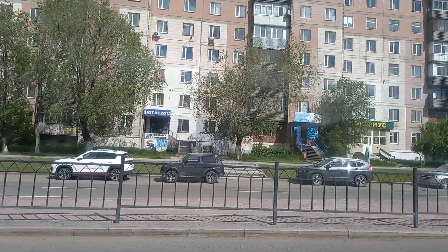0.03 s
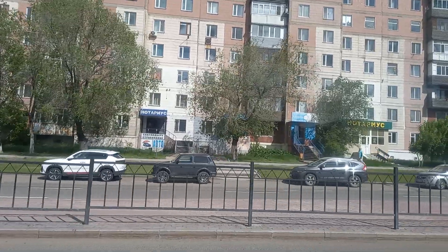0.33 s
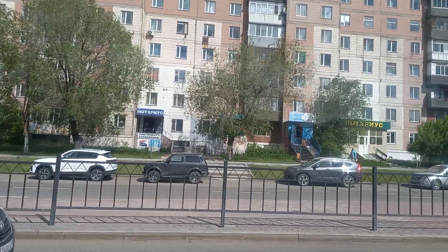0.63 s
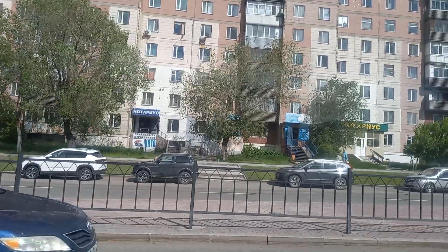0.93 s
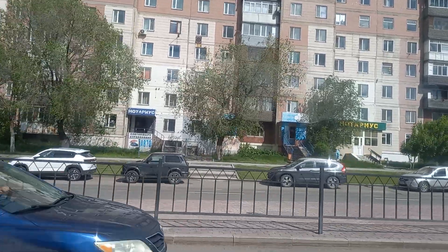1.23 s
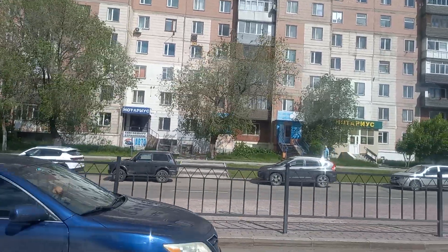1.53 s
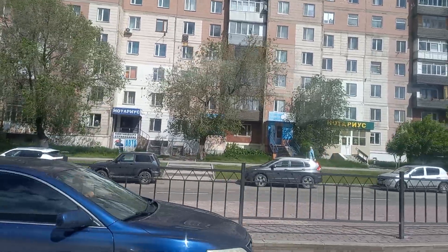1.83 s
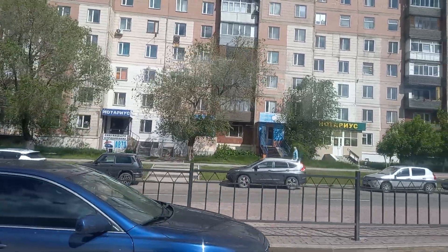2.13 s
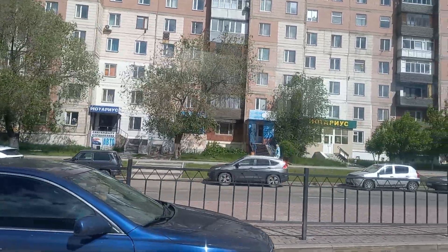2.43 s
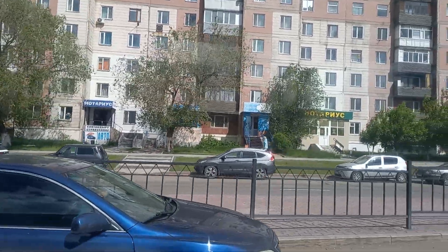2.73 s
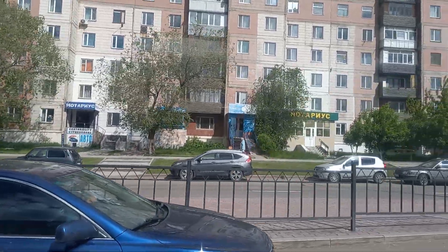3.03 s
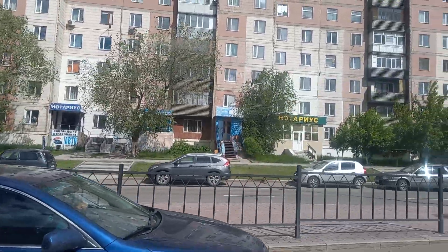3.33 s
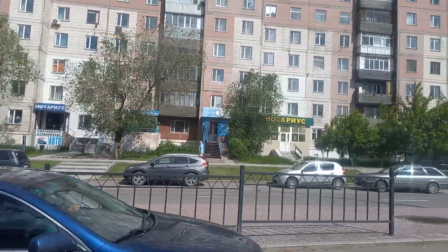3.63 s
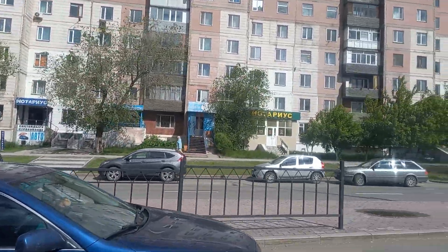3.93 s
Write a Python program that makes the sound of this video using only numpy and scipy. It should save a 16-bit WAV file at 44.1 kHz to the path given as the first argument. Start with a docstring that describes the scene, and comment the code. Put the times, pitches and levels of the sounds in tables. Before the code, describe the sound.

Bus engine drone and road hiss heard inside the cabin, with light plastic ticks.

```python
"""A four-cylinder bus engine, heard from a window seat as the bus pulls away, gathers speed and eases off.
Its orders swell as they sweep through the cabin's resonances. Underneath, the road shakes the body into
boom, rumble and soft thuds; the tyres roar and hiss, and thin air rushes past the window. An air valve
puffs twice and loose trim ticks close by. Taken inside the cabin on a pair of dull-topped microphones."""
import sys
import numpy as np
from scipy import signal
from scipy.fft import rfft, irfft, dct
from scipy.io import wavfile

SR = 44100
rng = np.random.default_rng(int(sys.argv[2]) if len(sys.argv) > 2 else 0)


def inscribe(sig):
    """Save sig as 16-bit PCM at rate SR to the path in sys.argv[1].

    A 1-D sig is mono; a 2-D sig holds one channel per row.
    Samples are clipped to [-1, 1] before scaling.
    """
    pcm = np.round(np.clip(np.atleast_2d(sig).T, -1, 1) * 32767)
    wavfile.write(sys.argv[1], SR, pcm.astype(np.int16))


N = 176400
T, HZ = np.arange(N) / SR, np.maximum(np.arange(N // 2 + 1) * SR / N, 1)

# engine firing rate, two firings to a crank turn: t/s, f/Hz
FIRING_RATE = [(0, 38.03), (.3, 37.17), (.7, 37.88), (1.05, 41.71), (1.4, 47), (1.7, 50), (1.95, 54.5),
               (2.2, 59.5), (2.4, 63.86), (2.55, 65.7), (2.68, 64), (2.9, 58.03), (3.15, 56.6),
               (3.35, 48.15), (3.55, 45.8), (3.75, 42.7), (4, 38.49)]
# engine load: t/s, level/dB
ENGINE_LOAD = [(0, -16.5), (.5, -5.5), (.7, -3.5), (.95, -3.5), (1.15, -1.5), (1.5, -0.5), (1.65, -1),
               (1.9, 2), (2.12, 3.5), (2.3, -2), (2.6, 0.5), (2.7, -10), (2.92, -13), (3.0, -2),
               (3.15, -3.5), (3.3, -8), (3.6, -4.5), (3.72, -3), (3.83, -4), (3.95, 0.5)]
# engine orders: cycles per crank turn, level/dB, dB per dB of load
ENGINE_ORDERS = [(2, -22.5, 3.8), (3, -18, 1), (4, -17, 1.5), (5, -36.5, 3.5), (6, -23.5, 1.97),
                 (7, -36.5, 0), (8, -33.5, 2.4), (10, -29.5, 1), (12, -38.5, -0.1)]
# how the cabin carries the engine to the seat: f/Hz, gain/dB
CABIN_RESPONSE = [(30, -20), (41, -13.5), (46, -0.5), (49, -7.5), (54, -24.5), (63, -27), (74, -4.5),
                  (80, -3), (86, 1), (93, -7.5), (103, -17), (117, -19), (126, -3), (131, -5.5), (141, -3),
                  (152, -12.5), (175, -14), (200, -18.5), (235, -9.5), (400, -25.5)]
# boom of the body all around: t/s, level/dB
BOOM_LEVEL = [(0, -28), (.5, -31.5), (.9, -32.5), (1.3, -21), (1.7, -27.5), (2.1, -25.5), (2.5, -21.5),
              (2.9, -26.5), (3.3, -24.5), (3.6, -29.5), (4, -23.5)]
# its colour: f/Hz, gain/dB
BOOM_COLOUR = [(20, -46.5), (32, -39), (44, -13), (58, -17.5), (70, -5.5), (83, 5.5), (96, -5.5),
               (112, -4.5), (140, -9.5), (200, -38)]
# road rumble: t/s, level/dB
RUMBLE_LEVEL = [(0, -41.5), (.15, -40.5), (.8, -38), (1.05, -33.5), (1.28, -28), (1.6, -30), (1.82, -27),
                (2.1, -29.5), (2.5, -28.5), (2.9, -34), (3.3, -34), (3.68, -35), (3.8, -28), (4, -31)]
# its colour: f/Hz, gain/dB
RUMBLE_COLOUR = [(100, -20), (135, -1), (170, -1.5), (200, 0.5), (235, -1), (280, -2), (360, -8),
                 (420, -12.5), (520, -17), (800, -51.5)]
# tyre roar, heard from inside: t/s, level/dB
ROAR_LEVEL = [(0, -50.5), (.3, -50.5), (.75, -49.5), (1, -45), (1.27, -41.5), (1.45, -41.5), (1.75, -38),
              (2.1, -42), (2.3, -40), (2.53, -39.5), (2.7, -47.5), (2.82, -42.5), (2.95, -46.5),
              (3.65, -48), (3.85, -45), (4, -47)]
# its colour: f/Hz, gain/dB
ROAR_COLOUR = [(300, -28.5), (450, -2.5), (520, -2.5), (600, -3.5), (730, -6), (900, -7), (1070, -7),
               (1250, -14), (1700, -22.5)]
# tyre hiss: t/s, level/dB
HISS_LEVEL = [(0, -57), (.3, -56.5), (.75, -56), (1, -52), (1.3, -46.5), (1.5, -47.5), (1.75, -44),
              (2.2, -47.5), (2.55, -45), (2.8, -48), (3.1, -50), (3.6, -52), (3.8, -52), (4, -52)]
# its colour: f/Hz, gain/dB
HISS_COLOUR = [(800, -24.5), (1250, 3.5), (1700, 3.5), (1950, 3.5), (2300, 3.5), (2700, 1.5), (3500, 0.5),
               (4500, 0.5), (5800, -1), (6500, -4.5), (7500, -13), (9000, -23)]
# thuds from bumps in the road: t/s, level/dB, f/Hz
ROAD_BUMPS = [(0.931, -28, 169.9), (1.38, -25, 238.7), (1.77, -22.5, 175), (3.099, -26, 191.7),
              (3.749, -25, 260.7)]
# valve jets, the first two merging into one puff: t/s, level/dB, hold/s, t60/s, low f/Hz, top f/Hz
VALVE_JETS = [(1.57, -35.5, 0.018, 0.19, 2960, 12860), (1.58, -36.5, 0.02, 0.21, 1202, 2863),
              (2.697, -39, .018, .22, 3020, 12100)]
# loose trim near the window: t/s, level/dB, crack f/Hz
TRIM_TICKS = [(0.12, -37, 2850), (0.532, -31.5, 3800), (0.5375, -28.5, 2062), (0.536, -26, 7550),
              (.5635, -33, 6500), (0.6307, -36, 4190), (0.7808, -33.5, 4300), (0.9096, -34, 4418),
              (1.067, -31, 4260), (1.094, -29, 6500), (1.293, -28.5, 4300), (2.8008, -23, 9500),
              (2.8358, -26.5, 6000), (2.9275, -30.5, 6500), (2.939, -29.5, 4374), (2.9677, -30, 6500),
              (3.055, -28.5, 4600), (3.060, -36, 5523), (3.2346, -24.5, 4000), (3.236, -33.5, 2000),
              (3.236, -34, 7000), (3.463, -29, 4200), (3.5272, -28, 4260), (3.7048, -33, 4400),
              (3.8361, -30.5, 4379)]
# ring of the trim: f/Hz, level/dB, t60/s
TRIM_RING = [(1970, -23, 0.037), (2700, -20.5, .02), (4085, -20, 0.018), (4600, -21.5, 0.012)]
# air just outside the window: t/s, level/dB
AIR_LEVEL = [(0, -67), (.75, -67), (1.1, -56.5), (1.5, -57), (1.75, -51.5), (2.1, -53.5), (2.35, -59),
             (2.65, -53.5), (2.85, -51), (3.2, -60), (3.55, -63), (4, -60.5)]
# its colour: f/Hz, gain/dB
AIR_COLOUR = [(6500, -13), (8000, -5.5), (9200, 0.5), (9900, 3.5), (10700, -5.5), (11400, -3.5),
              (12600, -8), (14300, -3.5), (15000, -3), (16000, -7)]
# narrow resonances of panels and windows: f/Hz, width/Hz, lift/dB
PANEL_RESONANCES = [(359, 16, 3), (423, 9.7, 4), (645.5, 14, 7), (818, 28, 3), (1053, 16, 7.5),
                    (1240, 24, 3.5), (1575, 11, 6), (1937, 20, 8.5), (2150, 20, 4.5), (2180, 31, 1.5),
                    (2600, 45, 1), (3140, 20, 4.5)]
# likeness of the cabin noise at the two microphones: f/Hz, coherence
MIC_COHERENCE = [(60, 0.89), (140, 0.99), (230, 0.8), (330, 0.87), (450, 0.27), (750, 0.94), (1150, 0.69),
                 (1700, .25), (4000, 0.2), (12000, 0.22)]
# its late arrival at the right microphone: f/Hz, lag/ms
RIGHT_MIC_LAG = [(100, 0.12), (200, 0.076), (500, 0.35), (750, 0.23), (1100, 0.48), (4000, .46)]
# left microphone: f/Hz, gain/dB
LEFT_MIC_RESPONSE = [(80, 0.66), (170, 1.5), (280, -2), (500, 1), (3500, -3), (5000, -1.5), (5900, 1),
                     (6400, -8), (6900, -14), (7300, -30.5), (7900, -20), (15000, -15)]
# right microphone: f/Hz, gain/dB
RIGHT_MIC_RESPONSE = [(80, 2.42), (170, 0.5), (280, -2), (500, 0.5), (3500, -2.5), (5000, -8.5),
                      (5900, -17), (6400, -16), (6900, -23.5), (7300, -29.5), (7900, -28), (15000, -17)]


def engine(wobble=0.0027, shudder_db=1.5):
    """The engine, dead centre: each crank order swells as it passes through a resonance of the cabin."""
    crank_hz = in_time(FIRING_RATE) / 2 * (1 + wobble * drift(6.2))
    turns = np.cumsum(crank_hz) / SR
    load_db = in_time(ENGINE_LOAD)
    out = 0
    for order, db, load_slope in ENGINE_ORDERS:
        cabin_db = at_hz(CABIN_RESPONSE, order * crank_hz)
        level_db = db + load_slope * load_db + cabin_db + shudder_db * drift(24)
        out += from_db(level_db) * np.sqrt(2) * np.sin(2 * np.pi * (order * turns + rng.random()))
    return out


def body_rumble():
    """The road shakes the body: a deep boom around the seat and a rumble above it in pitch."""
    boom = cabin_noise(BOOM_LEVEL, BOOM_COLOUR, flutter_db=0.4)
    rumble = cabin_noise(RUMBLE_LEVEL, RUMBLE_COLOUR, flutter_db=0.23)
    return boom + rumble


def tyres():
    """Tyres rolling on the road reach the seat as a midrange roar and a hiss."""
    roar = cabin_noise(ROAR_LEVEL, ROAR_COLOUR, flutter_db=0.74)
    hiss = cabin_noise(HISS_LEVEL, HISS_COLOUR, flutter_db=1.0)
    return roar + hiss


def bumps(rise_s=0.023):
    """Soft thuds up through the suspension: a body panel's note swells and quickly dies."""
    out = 0
    for start_s, db, hz in ROAD_BUMPS:
        age = np.clip((T - start_s) / rise_s, 0, 20)
        swell = age * np.exp(1 - age)
        out += from_db(db) * swell * np.sin(2 * np.pi * (hz * T + rng.random()))
    return out


def air_valve(attack_s=0.0019):
    """Short jets of air, wide across the microphones: a quick rise, a hold, then dying away."""
    out = 0
    for start_s, db, hold_s, t60, low_hz, top_hz in VALVE_JETS:
        rise = np.clip((T - start_s) / attack_s, 0, 1)
        decay = from_db(-60 * np.clip((T - start_s - hold_s) / t60, 0, 2))
        jet = rms_one(band(rng.standard_normal((2, N)), low_hz, top_hz))
        out += from_db(db) * rise * decay * jet
    return out


def trim_tick(db, hz, crack_t60=.006, tail_t60=.06, tail_db=-14, lag_s=.00046, pan_db=1.0):
    """One contact of hard plastic, nearer the left microphone: a crack, a short ring, a diffuse tail."""
    def colour(noise):
        peak = signal.lfilter(*signal.iirpeak(hz, Q=2.5, fs=SR), noise)
        return peak + .35 * band(noise, 1200, 22000)

    t = T[:SR // 10]
    crack = colour(rng.standard_normal(len(t)) * from_db(-60 * t / crack_t60))
    tail = colour(rng.standard_normal((2, len(t))) * from_db(tail_db - 60 * t / tail_t60))
    ring = sum(from_db(mode_db - 60 * t / t60) * np.sin(2 * np.pi * (mode_hz * t + rng.random()))
               for mode_hz, mode_db, t60 in TRIM_RING)
    left = crack / np.abs(crack).max() + ring
    right = np.interp(t - lag_s, t, left, left=0)
    return from_db([[db + pan_db], [db - pan_db]]) * (np.array([left, right]) + tail)


def loose_trim():
    """Trim near the window ticks now and then as the body flexes."""
    out = np.zeros((2, N + SR))
    for start_s, db, hz in TRIM_TICKS:
        tick, start = trim_tick(db, hz), int(start_s * SR)
        out[:, start:start + tick.shape[1]] += tick
    return out[:, :N]


def window_air():
    """Air rushing past outside the glass, thin and faint behind everything else."""
    return cabin_noise(AIR_LEVEL, AIR_COLOUR, flutter_db=1.1)


def cabin_noise(level, colour, flutter_db):
    """Slightly uneven noise, coloured by panels and windows, as it reaches the two microphones."""
    gain = from_db(in_time(level) + flutter_db * drift(16))
    mid, side = rfft(rng.standard_normal((2, N)))
    coherence = at_hz(MIC_COHERENCE, HZ)
    pair = np.sqrt(1 + coherence) * mid + np.sqrt(1 - coherence) * side * [[1], [-1]]
    pair[1] *= np.exp(-2j * np.pi * HZ * at_hz(RIGHT_MIC_LAG, HZ) / 1000)
    low_hz, top_hz = colour[0][0] / 2, colour[-1][0] * 2   # an octave beyond each end of the table
    skirts = 1 / (1 + (HZ / top_hz) ** 4) / (1 + (low_hz / HZ) ** 4)
    panels_db = sum(lift / (1 + (2 * (HZ - hz) / width) ** 2) for hz, width, lift in PANEL_RESONANCES)
    spectrum = pair * skirts * from_db(at_hz(colour, HZ) + panels_db)
    return gain * rms_one(irfft(spectrum, N))


def from_db(db):
    """Decibels to gain."""
    return 10 ** (np.asarray(db) / 20)


def rms_one(x):
    """Scale to unit rms."""
    return x / np.sqrt(np.mean(x ** 2) + 1e-20)


def in_time(rows):
    """Read a time table at every sample."""
    return np.interp(T, *np.transpose(rows))


def at_hz(rows, hz):
    """Read a table on a log-frequency axis."""
    f, value = np.transpose(rows)
    return np.interp(np.log(hz), np.log(f), value)


def drift(rate_hz):
    """Slow random wander of unit rms."""
    return rms_one(irfft(rfft(rng.standard_normal(N)) / (1 + (HZ / rate_hz) ** 2), N))


def band(x, low_hz, top_hz):
    """Band-pass, its top edge held below half the sample rate."""
    edges_hz = [low_hz, min(top_hz, SR / 2 - 1000)]
    return signal.sosfilt(signal.butter(2, edges_hz, "band", fs=SR, output="sos"), x)


def scene():
    """Everything that reaches a window seat in a city bus."""
    return engine() + body_rumble() + tyres() + window_air() + bumps() + air_valve() + loose_trim()


def record(dry):
    """Two microphones at the seat, both dull on top, the right one duller; the very top is cut."""
    response = from_db([at_hz(LEFT_MIC_RESPONSE, HZ), at_hz(RIGHT_MIC_RESPONSE, HZ)])
    response = np.repeat(response, 2, axis=1)[:, :N]   # cosine bins lie twice as close as those of HZ
    coloured = dct(dct(dry, norm="ortho") * response, type=3, norm="ortho")
    top_cut = signal.ellip(10, .1, 80, 15800, fs=SR, output="sos")   # steep above 15.8 kHz
    return signal.sosfilt(top_cut, coloured)


dry = scene()
out = record(dry)
inscribe(out)
```